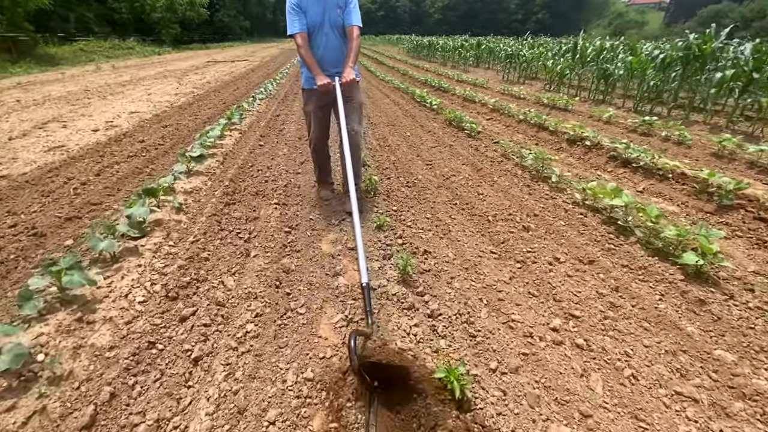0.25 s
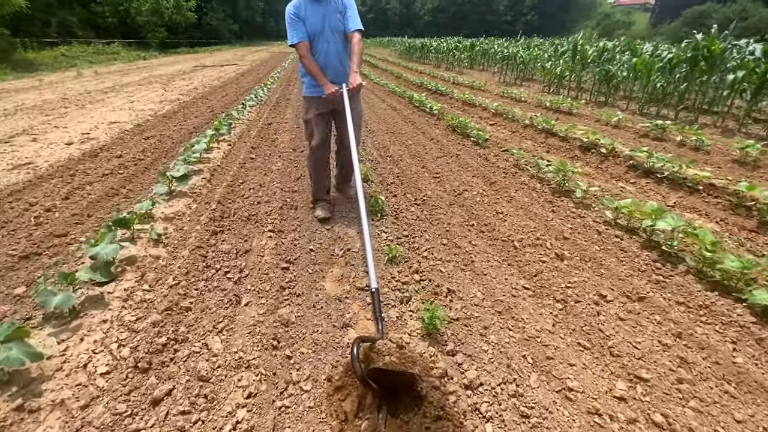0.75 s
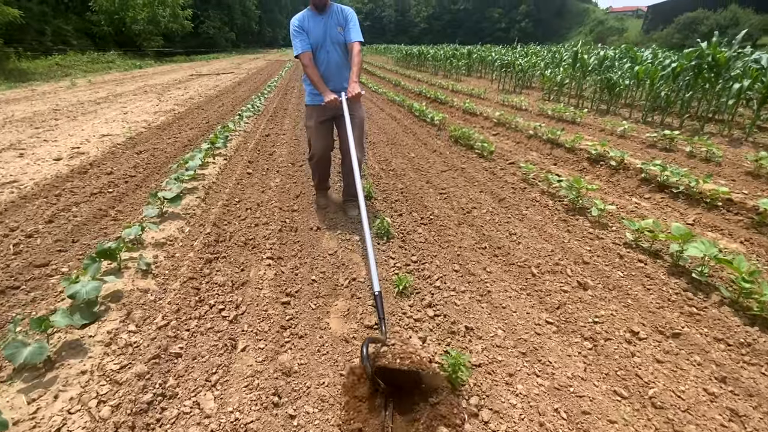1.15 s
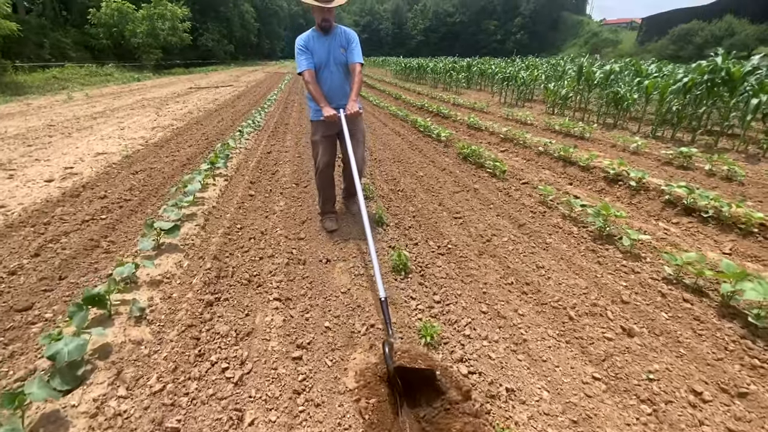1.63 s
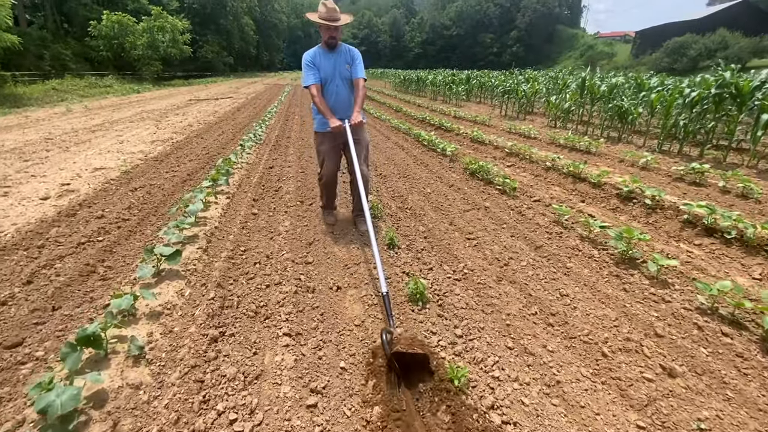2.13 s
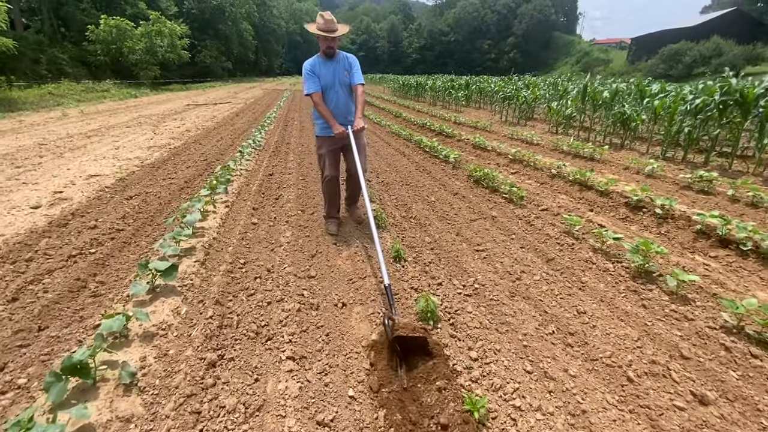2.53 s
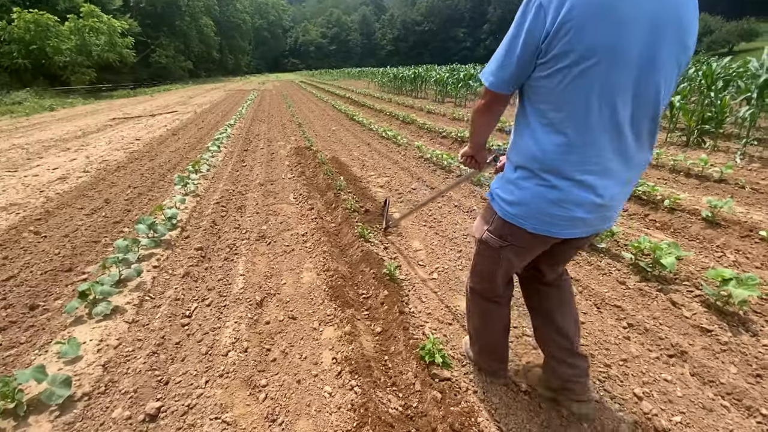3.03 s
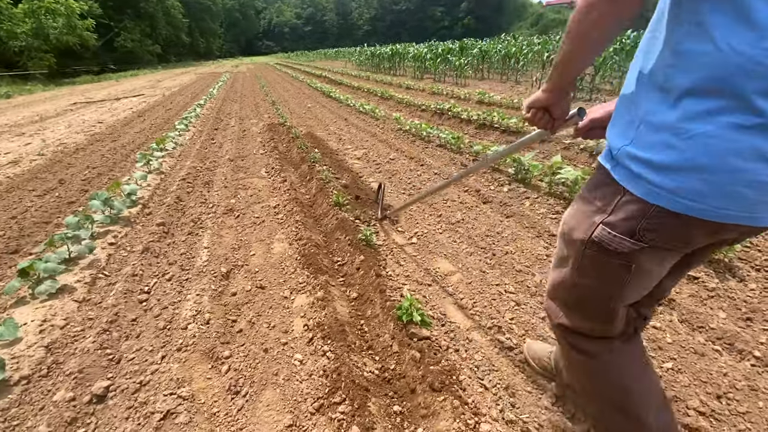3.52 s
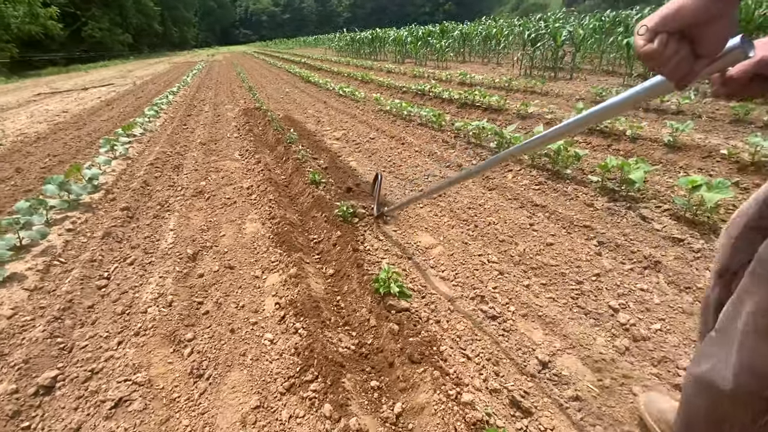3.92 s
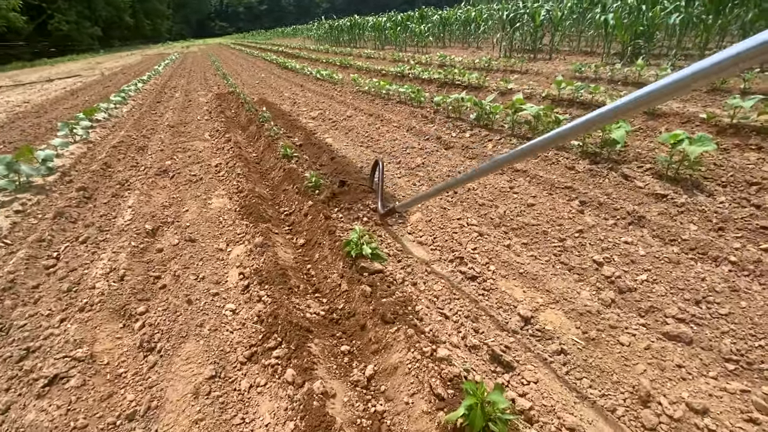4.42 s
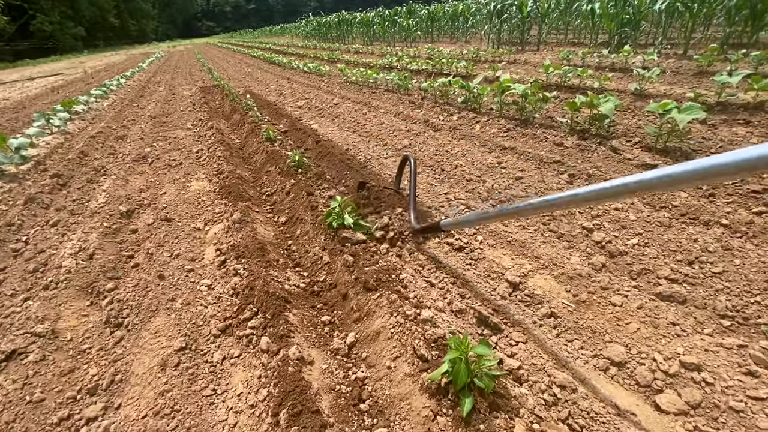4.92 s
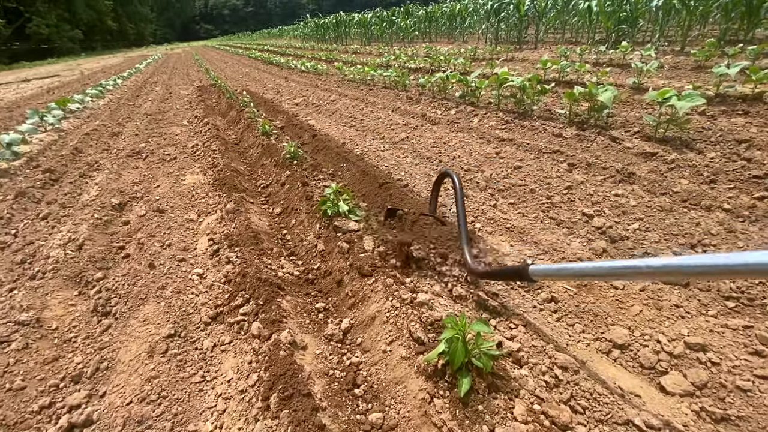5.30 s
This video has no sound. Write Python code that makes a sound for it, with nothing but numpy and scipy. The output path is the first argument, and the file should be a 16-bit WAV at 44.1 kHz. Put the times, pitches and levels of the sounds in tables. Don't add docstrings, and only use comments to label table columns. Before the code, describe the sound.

Outdoors in an open field, a steel hand plow is dragged through dry soil. At first it is quiet and distant: thin grit scraping, small stone ticks, soft thuds. After an abrupt cut it comes closer, with crunching crusts, hollow clod knocks and a few bird chirps, then builds to loud scraping and metallic clanks. Stereo camera microphones, with low wind rumble.

```python
import sys
import numpy as np
from scipy import signal
from scipy.fft import rfft, irfft, next_fast_len
from scipy.io import wavfile
from scipy.ndimage import uniform_filter1d, map_coordinates

SR = 44100
rng = np.random.default_rng(int(sys.argv[2]) if len(sys.argv) > 2 else 0)


def output_pcm(signal):
    pcm = np.clip(np.atleast_2d(signal).T, -1, 1) * 32767
    wavfile.write(sys.argv[1], SR, np.round(pcm).astype(np.int16))


def ratio_of_db(decibels):
    return 10 ** (np.asarray(decibels, float) / 20)


N = 244966
LONG = next_fast_len(N + SR // 4)
HZ = np.fft.rfftfreq(LONG, 1 / SR)
T = np.arange(N) / SR
NEW_STAND_S = 2.73


def unit(x):
    return x / np.sqrt(np.mean(x ** 2))


def shape(points):
    hz, db = np.transpose(points)
    return ratio_of_db(np.interp(np.log(HZ + 1), np.log(hz), db))


def colour(x, gain):
    return irfft(rfft(x, LONG) * gain, LONG)[..., :N]


def add(track, x, start_s):
    i = int(start_s * SR)
    track[i:i + len(x)] += x[:N - i]


def slew(rate):
    k = int(SR / rate)
    return uniform_filter1d(np.repeat(rng.standard_normal(N // k + 1), k), k)[:N]


def fade(t, t60):
    return np.exp(-np.log(1000) * t / t60)


def hump(start_s, length_s):
    rise_s, fall_s = 0.032, 0.028
    rise = (T - start_s) / rise_s + .5
    fall = (start_s + length_s - T) / fall_s + .5
    return np.clip(np.minimum(rise, fall), 0, 1)


def modes(table, hz, place_db):
    s = 1j * hz
    response = 0
    for k, (mode_hz, width, db) in enumerate(table):
        response = response + ratio_of_db(db + place_db[k]) * width * s / (s * s + width * s + mode_hz * mode_hz)
    return response


def ring(hz, t60, swell_s, turn):
    t = np.arange(2500) / SR
    return np.sin(2 * np.pi * (hz * t + turn)) * fade(t, t60) * (1 - np.exp(-t / swell_s))


def burst(t60, hz, width, chance):
    t, t60 = np.arange(len(chance)) / SR, np.clip(t60, .008, .5)
    body = signal.iirpeak(hz, hz / width, fs=SR)
    spiky = chance * np.abs(chance) ** 0.15
    x = signal.lfilter(*body, signal.lfilter(*body, spiky))
    x = x / np.sqrt(np.abs(uniform_filter1d(x ** 2, int(2 * SR / width) + 40)) + 1e-9)
    swell_s = 0.031 * t60 + 0.13 * t60 ** 2
    return x * (1 - np.exp(-t / swell_s)) * fade(t, t60)


def grains(rate, spread_db, flutter_db, flutter_rate):
    draw = rng.random((3, N))
    size = ratio_of_db(-spread_db * np.log(1.002 - draw[2]))
    cracks = (draw[0] < rate / SR) * np.sign(draw[1] - .5) * size
    return cracks * ratio_of_db(flutter_db * slew(flutter_rate))


def rubble(points, lo_hz, hi_hz, count, *kind):
    centres = np.geomspace(lo_hz, hi_hz, count)
    spacing = np.log(centres[1] / centres[0])
    near = np.exp(-(np.log((HZ + 1) / centres[:, None]) / spacing) ** 2)
    total = np.sum(near, axis=0)
    share = np.sqrt(near / (total + 1e-30) + (total < 1e-30) / count)
    return unit(sum(colour(grains(*kind), shape(points) * part) for part in share))


# start_s, scrape_db of the share, load_db of lumps it turns over
PULL = [(0, -59.5, -61.5), (.3, -56, -63.5), (.55, -60.5, -61.5), (1.6, -58, -56), (2.15, -63, -68.5),
        (2.72, -65.5, -57.5), (2.76, -55.5, -54.5), (3.5, -51, -48.5), (4.2, -47.5, -42), (4.75, -48, -45),
        (5.1, -44, -43.5), (5.42, -36.5, -41), (5.55, -49, -45)]
# start_s, length_s, load_db added
HEAVES = [(0.46, 0.048, 2.5), (1.204, 0.065, 10), (1.628, 0.1, 4), (2.061, 0.11, 11.5), (2.326, 0.17, 4),
          (2.818, 0.12, 2), (3.078, 0.1, 9), (3.205, 0.069, 5.5), (3.532, 0.21, 5.5), (3.83, 0.15, 2.5),
          (4.094, 0.17, 6), (4.638, 0.096, 6), (4.833, 0.1, 6.5), (5.061, 0.097, 8)]
# start_s, length_s, scrape_db added, load_db
LULLS = [(0.865, 0.087, 0.5, -7), (1.067, 0.1, 0.5, -12.5), (1.742, 0.056, 5.5, 1.5),
         (2.247, 0.089, 2.5, -7), (2.534, 0.17, -1.5, -4), (2.974, 0.073, -3.5, -3.5),
         (3.457, 0.054, -5, -7), (4.27, 0.036, 0.5, -1.5), (4.53, 0.06, -0.5, -4),
         (4.74, 0.059, -2.5, -5.5), (5.159, 0.034, -8, 2), (5.329, 0.016, -10, -5),
         (5.455, 0.037, -5.5, -5.5), (3.336, 0.064, -0.5, -0.5), (3.771, 0.027, -4.5, -2.5),
         (4.047, 0.076, -2, 1), (4.376, 0.034, 3.5, -2.5), (5.255, 0.031, -2.5, -4), (2.156, 0.059, 1, -1)]


def pull():
    start_s, *columns = np.transpose(PULL)
    scrape, load = (np.interp(T, start_s, c) for c in columns)
    heave = np.max([db * hump(s, length) for s, length, db in HEAVES], axis=0)
    scrape, load = scrape + 0.17 * heave, load + heave
    for s, length, scrape_db, load_db in LULLS:
        lull = hump(s, length)
        scrape, load = scrape + scrape_db * lull, load + load_db * lull
    return scrape, load


# pitch_hz, width_hz, level_db
BLADE_FRONT = [(1820, 1800, -9), (2690, 35, -3), (3700, 40, -7), (4480, 60, -6), (5050, 50, -6),
               (5310, 120, -6), (6060, 40, -3), (6420, 40, -4), (7550, 60, -6)]
# pitch_hz, width_hz, level_db
BLADE_SIDE = [(1000, 80, -4), (1213, 25, -5), (1504, 30, -6), (1680, 30, -4), (1920, 50, -2),
              (2130, 40, -2), (2195, 40, -3), (2450, 300, -7), (2700, 50, -6), (3040, 100, -4),
              (3560, 46, -7), (4190, 40, -3), (4770, 49, -8), (5460, 60, -4), (6000, 40, -8),
              (6500, 80, -8), (7270, 30, 0), (7372, 30, -4), (7450, 30, -3), (7510, 40, -4), (8570, 33, -4),
              (8730, 45, -3), (11100, 150, -10)]


def blade(force):
    front, even, sets = T < NEW_STAND_S, np.zeros(len(BLADE_SIDE)), 3
    out = colour(force * front, modes(BLADE_FRONT, HZ, even))
    for k in range(sets):
        sing = ratio_of_db(6.5 * slew(13) - 7.0)
        out = out + colour(force * ~front * sing, modes(BLADE_SIDE[k::sets], HZ, even))
    return out


# pitch_hz, level_db per hertz
GRIT = [(1180, -57), (2000, -3), (2470, -7), (3000, -0.5), (3350, -2.5), (4080, 0), (6840, -4.5),
        (7480, -2), (12000, -8), (15600, -10), (22000, -120)]
# pitch_hz, level_db per hertz
CRUMBS = [(200, -72), (500, -2), (900, 6), (1400, 7), (2500, -3), (3600, -14), (6000, -29), (12000, -56)]


def stream(grit_db, crumbs_db):
    grit = rubble(GRIT, 1060, 13800, 4, 6000, 3.53, 5.35, 25) * ratio_of_db(grit_db - 5.5)
    crumbs = rubble(CRUMBS, 1220, 4000, 3, 1300, 2.8, 6.5, 22) * ratio_of_db(crumbs_db - 3.5)
    return grit + crumbs + ratio_of_db(4.0) * blade(grit + 0.038 * crumbs)


# pitch_hz, level_db per hertz
CLODS = [(41, -8), (100, 3), (165, 2), (292, -1), (430, 0), (720, -3.5), (999, -9), (1420, -14),
         (1600, -12), (2080, -16), (3520, -120)]


def clods(clods_db):
    return rubble(CLODS, 108, 1020, 4, 250, 2.3, 2.7, 18) * ratio_of_db(clods_db - 3.5)


# start_s, level_db, pitch_hz, t60_s
RUBS = [(0, -71, 2670, 0.46), (1.424, -46.5, 1693, 0.072), (1.634, -54, 1510, 0.056),
        (1.567, -54, 4480, 0.17), (2.8, -66, 5900, 0.54), (3.859, -39, 5480, 0.11), (4.18, -53, 5500, 0.2),
        (4.175, -43, 2137, 0.1), (4.28, -42, 7480, 0.21), (4.3, -56, 5400, 0.48), (4.41, -49, 5470, 0.098),
        (4.52, -44, 7410, 0.18), (4.979, -43, 7230, 0.64), (5.062, -36.5, 7390, 0.21),
        (5.214, -37, 8740, 0.13), (5.21, -51, 965, 0.09), (5.264, -40, 1680, 0.1),
        (5.283, -38, 1905, 0.051), (5.302, -47, 3160, 0.03), (5.27, -43.5, 4830, 0.092),
        (5.313, -34, 4167, 0.2), (5.322, -34.5, 8650, 0.1), (5.335, -46.5, 5660, 0.21),
        (5.384, -36, 4130, 0.07), (5.41, -41.5, 2190, 0.1), (1.264, -47.5, 1530, 0.11),
        (1.567, -54, 2650, .04), (2.731, -52, 1703, 0.17), (3.686, -43.5, 7200, .06),
        (3.85, -51.5, 3640, 0.17), (3.86, -49, 7860, 0.14), (4.292, -45, 6490, .05),
        (4.33, -47, 3930, 0.063), (4.404, -45, 2240, 0.1), (4.469, -47, 5900, 0.033),
        (4.675, -46, 8750, 0.19), (4.675, -47, 7480, 0.18), (4.67, -50, 5480, 0.14),
        (4.921, -50, 6230, 0.074), (5.06, -36.5, 3080, 0.05), (5.063, -37, 8900, .12),
        (5.14, -46.5, 7400, 0.36), (5.345, -42, 4160, .08), (5.39, -47, 5600, 0.1),
        (5.428, -40, 8600, 0.073), (5.27, -49, 2160, 0.11)]


def rubs():
    out, chance = np.zeros(N), rng.standard_normal((len(RUBS), 16000))
    for (s, db, hz, t60), noise in zip(RUBS, chance):
        skips = uniform_filter1d(np.repeat(noise[::400], 400), 250)
        add(out, ratio_of_db(db + 6.0 + 3.9 * skips) * burst(t60, hz, 50 + 0.012 * hz, noise), s)
    return out


# start_s, level_db
GUSTS = [(0, -77), (.6, -70.5), (1.5, -60.5), (2.7, -60.5), (4.3, -46.5), (5.55, -51.5)]
# pitch_hz, level_db per hertz
WIND = [(12, -50), (28, -19), (45, 6.5), (70, 15.5), (110, 7.5), (200, -13), (600, -82)]
# pitch_hz, level_db per hertz
BUFFET = [(12, -46), (30, -10), (50, 2.5), (140, -7), (260, -13.5), (700, -80)]


def wind():
    wind_db = np.interp(T, *np.transpose(GUSTS)) - 3
    shared = unit(colour(grains(150, 2.5, 2.5, 7), shape(WIND)))
    own = np.array([unit(colour(grains(250, 2.5, 3., 7), shape(BUFFET))) for _ in range(2)])
    return ratio_of_db(wind_db + 7.0) * (shared + own * np.array([[1.5], [1.25]]))


def field_hiss():
    points = [(100, 6.5), (1000, -4.5), (6000, -20.0), (12000, -8), (13000, -0.5)]  # hz, level_db
    return ratio_of_db(-55.0) * unit(colour(rng.standard_normal((2, N)), shape(points)))


def strikes(table, broad, width):
    out, size = np.zeros(N), 8192
    chance = rng.standard_normal((len(table), 2, size))
    hz_axis = np.fft.rfftfreq(size, 1 / SR)
    for (s, db, hz, t60, ring_db), (fine, coarse) in zip(table, chance):
        crack = burst(t60, hz, width * hz, fine) + broad * burst(t60, 6300, 12800, coarse)
        plate = BLADE_FRONT if s < NEW_STAND_S else BLADE_SIDE
        steel = modes(plate, hz_axis, 3 * fine[::-1])
        add(out, ratio_of_db(db - 6) * (crack + ratio_of_db(ring_db + 12) * irfft(rfft(crack) * steel)), s)
    return out


# start_s, peak_db, pitch_hz, t60_s
STONES = [(0.2508, -35.5, 4130, 0.023), (0.277, -40, 7350, 0.027), (0.341, -45, 5030, 0.018),
          (.545, -54, 5500, .025), (.64, -46, 2740, 0.097), (0.389, -41.5, 5900, 0.054),
          (0.402, -38.5, 7300, 0.1), (0.763, -45, 4500, 0.035), (0.9694, -45, 4740, 0.022),
          (0.985, -32, 4240, 0.019), (1.097, -47, 6540, 0.024), (1.2232, -36, 3700, 0.12),
          (1.248, -31, 3800, 0.12), (1.253, -39.5, 5160, 0.18), (1.514, -43.5, 4030, 0.09),
          (1.737, -48, 6100, 0.04), (1.756, -37, 4870, 0.027), (1.922, -43, 4270, 0.024),
          (2.072, -38.5, 4200, 0.074), (2.312, -47, 4000, 0.032), (2.572, -46.5, 4400, 0.081),
          (2.6776, -50, 4560, 0.11),
          (3.113, -37.5, 3300, 0.22), (3.206, -44, 5600, 0.043), (3.248, -42, 8900, 0.021),
               (3.418, -35.5, 7200, 0.1), (3.686, -34.5, 6560, 0.049), (3.82, -33, 6660, 0.068),
               (3.8452, -30.5, 5960, 0.14), (4.2971, -36.5, 6700, 0.087), (4.471, -40, 5950, 0.053),
               (4.5256, -35, 7900, 0.035), (4.672, -33.5, 6800, 0.13), (4.822, -34, 5200, 0.038),
               (4.8496, -20, 4600, 0.05), (4.922, -32.5, 7200, 0.17), (4.993, -28, 7500, 0.26),
               (5.0677, -25, 7900, 0.083), (5.3198, -21.5, 3900, 0.034), (5.511, -42, 7220, 0.044)]


def stones():
    table = [(*row, -12 + 6 * np.log2(row[2] / 4500)) for row in STONES]
    return strikes(table, 1.0, 0.24)


# start_s, peak_db, pitch_hz
CLOD_KNOCKS = [(.374, -47.5, 450), (0.511, -48, 694), (0.643, -48, 367), (1.039, -48.5, 380),
               (1.219, -34.5, 643), (1.249, -34.5, 287), (1.572, -44.5, 520), (1.633, -35.5, 845),
               (2.08, -39, 770), (2.864, -32.5, 617), (3.144, -23, 535), (3.21, -40, 524),
               (3.246, -33, 553), (3.525, -28.5, 380), (3.592, -26.5, 350), (3.629, -31.5, 455),
               (3.914, -34, 363), (3.94, -32, 450), (4.008, -21, 357), (4.097, -27, 360),
               (4.113, -24.5, 530), (4.178, -35, 485), (4.219, -32.5, 540), (4.295, -34, 520),
               (4.494, -34, 454), (4.658, -16.5, 407), (4.932, -27, 408), (5.077, -19, 427),
               (5.529, -29.5, 443)]
# start_s, peak_db, pitch_hz
THUDS = [(1.102, -44.5, 154), (1.402, -40.5, 283), (1.54, -43, 190), (1.801, -38.5, 192), (1.895, -41, 213),
         (1.921, -43.5, 201), (2.129, -47, 130), (2.377, -37, 158), (2.597, -39, 125), (2.3, -49.5, 285),
         (2.87, -39, 283), (2.901, -37, 203), (2.939, -36.5, 223), (3.024, -42.5, 263), (3.064, -35.5, 214),
         (3.13, -23.5, 217), (3.6, -32, 170), (3.902, -49, 140), (3.96, -39, 150), (4.123, -22.5, 158),
         (4.199, -26, 210), (4.31, -35, 130), (4.6, -34, 149), (4.662, -29.5, 200), (4.747, -31, 151),
         (4.857, -33, 262), (5.079, -34, 190), (5.149, -26, 152.6), (5.2, -36.5, 271), (5.305, -29.5, 147),
         (5.372, -19, 185), (5.418, -21, 181), (5.45, -39, 302)]


def knocks():
    longest_s, knee_db, shorter_per_db = 0.13, -24.5, 0.25
    table = CLOD_KNOCKS + THUDS
    out, chance = np.zeros(N), rng.standard_normal((len(table), 8000))
    for (s, db, hz), noise in zip(table, chance):
        t60 = longest_s * np.exp(-shorter_per_db * max(db - knee_db, 0))
        add(out, ratio_of_db(db - 1) * burst(t60, hz, 0.51 * hz, noise), s)
    return out


# start_s, peak_db, pitch_hz
CRUSTS = [(0.392, -38.5, 2240), (.969, -39, 2460), (1.035, -48.5, 1290), (1.224, -33, 1160),
          (1.249, -33, 1420), (1.255, -33, 2620), (1.424, -36.5, 1970), (1.438, -40, 1520),
          (1.568, -36.5, 2280), (1.63, -37.5, 1680), (1.656, -48, 1000), (2.079, -37, 1250),
          (2.732, -46, 1670), (3.090, -42, 1700), (3.132, -28, 1220), (3.211, -39, 1300),
          (3.248, -34, 1280), (3.364, -36, 1220), (3.609, -29, 1100), (3.692, -39, 1520),
          (3.939, -30.5, 1160), (4.008, -35, 1200), (4.098, -30, 1200), (4.166, -40, 2110),
          (4.239, -27, 1140), (4.332, -26, 1160), (4.403, -33, 2020), (4.682, -23.5, 1240),
          (4.825, -27, 2030), (4.851, -23, 2960), (5.057, -28, 3070)]


def crusts():
    t60_s, ring_db = 0.046, -8
    return ratio_of_db(-0.5) * strikes([(*row, t60_s, ring_db) for row in CRUSTS], 0.37, 0.66)


# start_s, peak_db, pitch_hz
RAPS = [(.447, -44, 600), (2.851, -31.5, 635), (2.892, -29, 610), (2.937, -33, 690), (3.027, -34.5, 586),
        (3.066, -36, 497), (3.092, -41, 1030), (3.131, -22, 586), (3.14, -25, 422), (3.212, -33, 620),
        (3.248, -30, 550), (3.265, -30, 597), (3.819, -32, 740), (3.845, -43, 560), (3.937, -24, 700),
        (4.02, -33, 820), (4.1, -22.5, 470), (4.112, -27, 550), (4.121, -19, 505), (4.129, -20.5, 367),
        (4.14, -20, 606), (4.147, -22, 640), (4.166, -29, 750), (4.183, -25, 482), (4.221, -22, 540),
        (4.238, -21.5, 845), (4.33, -23.5, 860), (4.657, -17.5, 760), (4.659, -19, 418), (4.857, -15, 970),
        (4.87, -22.5, 620), (5.068, -32, 603), (5.09, -27, 700), (5.105, -31, 850), (5.121, -23.5, 450),
        (5.14, -36, 710), (5.29, -21, 910), (5.45, -20, 685)]


def raps():
    out, cycles = np.zeros(N), 8.3
    for (s, db, hz), turn in zip(RAPS, rng.random(len(RAPS))):
        add(out, ratio_of_db(db + 5.5) * ring(hz, cycles / hz, 0.0012, turn), s)
    return out


# middle_s, peak_db, pitch_hz
PUFFS = [(0.666, -38, 70), (.775, -41.5, 75), (.92, -49, 104), (1.23, -52, 115), (1.561, -41, 94),
         (1.586, -38, 58), (1.817, -34, 86), (1.875, -36.5, 92), (2.818, -39, 60), (3.27, -42, 80),
         (3.441, -43, 81), (3.585, -37, 80), (3.774, -32.5, 60), (3.931, -34, 95), (3.976, -34.5, 74.5),
         (4.061, -31, 75), (4.209, -27, 60), (4.331, -30, 89.5), (4.445, -35, 83), (4.529, -29.5, 69),
         (4.61, -38, 80), (4.755, -23.5, 95), (4.805, -39, 70), (4.985, -38, 64.4), (5.252, -29.5, 66.4)]


def puffs():
    out, cycles = np.zeros((2, N)), 3.47
    for (s, db, hz), (turn, lead, pan) in zip(PUFFS, rng.random((len(PUFFS), 3))):
        length_s = cycles / hz
        u = np.linspace(0, 1, int(length_s * SR))
        for track, side in zip(out, (.5, -.5)):
            swell = ratio_of_db(db + side * 7.4 * (pan - 1.0)) * np.sin(np.pi * u) ** 2
            phase = cycles * u + turn + side * 0.27 * (lead - .7)
            add(track, swell * np.sin(2 * np.pi * phase), s - length_s / 2)
    return out


# start_s, length_s, first_hz, middle_hz, last_hz, level_db
CHIRPS = [
    (2.789, 0.043, 2940, 3900, 4300, -57),
    (2.844, 0.018, 4450, 4200, 3900, -62),
    (2.965, 0.055, 5600, 4500, 4140, -53),
    (3.082, 0.04, 4850, 4450, 4250, -57),
    (3.245, 0.08, 4400, 4170, 3700, -59),
]


def bird():
    out = np.zeros(N)
    for s, length, *hz, db in CHIRPS:
        u = np.linspace(0, 1, int(length * SR))
        pitch = np.polyval(np.polyfit([0, .5, 1], hz, deg=2), u)
        swell = np.sqrt(u) * np.abs(np.sin(np.pi * u)) ** .5
        add(out, ratio_of_db(db + 4.0) * swell * np.sin(2 * np.pi * np.cumsum(pitch) / SR), s)
    return out * ratio_of_db(3.2 * slew(90))


# start_s, peak_db
CLANKS = [
    (4.401, -39),
    (5.059, -27),
    (5.2023, -23.5),
    (5.2152, -19),
    (5.2303, -25),
    (5.244, -27),
    (5.42, -29),
]
# pitch_hz, level_db, t60_s, lag aside in samples
NECK = [(1000, -4.5, 0.024, -16), (1680, -6.5, 0.026, -13), (1933, -3, 0.035, -0.5),
        (2190, -6.5, 0.023, -0.5), (2950, -6, 0.022, -3)]


def clanks():
    out = np.zeros((len(NECK), N))
    chance = rng.standard_normal((len(CLANKS), len(NECK), 2500))
    for (s, db), draws in zip(CLANKS, chance):
        for track, (hz, mode_db, t60, _), noise in zip(out, NECK, draws):
            a, b = noise[:2]
            tone = ring(hz * (1 + 0.011 * b), t60, 0.0027, b)
            rough = tone + 0.34 * burst(1.2 * t60, hz, 0.23 * hz, noise)
            add(track, ratio_of_db(db + mode_db + 1.8 * a + 4.0) * rough, s)
    return sum(ports(np.array([track, track]), row[3]) for track, row in zip(out, NECK))


# start_s, peak_db, pitch_hz
SHATTER = [(5.266, -30, 1680), (5.297, -39, 2100), (5.346, -37, 3720), (5.373, -44, 2600),
           (5.284, -27, 1630), (5.407, -30, 3080), (5.418, -40, 2220), (5.45, -39, 1480),
           (5.512, -29.5, 1100)]


def shatter():
    t60_s, ring_db = 0.061, -4
    return ratio_of_db(-0.5) * strikes([(*row, t60_s, ring_db) for row in SHATTER], 0.37, 0.66)


def ground(x):
    t = np.arange(4000) / SR
    tails = rng.standard_normal((2, len(t))) * fade(t, .05)
    tails = rfft(tails / np.sqrt(np.sum(tails ** 2, axis=1, keepdims=True)), LONG)
    return ratio_of_db(2.0) * colour(x, 1 + ratio_of_db(-5) * tails * shape([(500, -8), (2500, 0)]))


# start_s, lag in samples
LEFT_LAG = [(0, -0.5), (2.72, 1), (2.74, 6.5), (3.8, 10.5), (4.5, 15.5), (5.55, 18.5)]
# pitch_hz, level_db
LEFT_FRONT = [(250, 1), (500, 2), (1500, -2), (2900, 1), (4000, 8), (6300, 16), (7500, 8), (9000, 1)]
# pitch_hz, level_db
LEFT_SIDE = [(60, 1), (220, 3), (370, -3), (1000, -1), (2500, 1), (5300, 3), (7500, 1), (8700, -3)]


def ports(x, aside):
    lag = np.interp(T, *np.transpose(LEFT_LAG)) + aside
    left = map_coordinates(x[0], [np.arange(N) - lag], order=3, mode="nearest")
    front = T < NEW_STAND_S
    pair, side = np.array([left, x[1]]), np.array([[.5], [-.5]])
    return colour(pair * front, shape(LEFT_FRONT) ** side) + colour(pair * ~front, shape(LEFT_SIDE) ** side)


def scene():
    scrape, load = pull()
    grit_db, clods_db = scrape, load + 2
    crumbs_db = scrape + 0.52 * (load - scrape) - 1
    plow = stream(grit_db, crumbs_db) + rubs() + stones() + crusts() + shatter()
    lumps = clods(clods_db) + knocks() + raps()
    air = ports(ground(plow + lumps), 0) + clanks()
    furrow = 1.18 * stream(grit_db, crumbs_db) + 0.88 * clods(clods_db)
    air = air + ports(ground(furrow), -3.5)
    return air + bird() + wind() + puffs() + field_hiss()


def low_pass(x):
    return signal.sosfilt(signal.butter(12, 16320, fs=SR, output="sos"), x)


# pitch_hz, level_db
TREBLE = [(9300, 0), (9500, -7), (9750, 0), (12250, -3), (12550, -23), (13600, -24), (14100, -10),
          (14700, -15), (15600, -21), (15850, -50)]
# pitch_hz, lead in radians
RIGHT_LEAD = [(60, 2.0), (100, 2.1), (140, 1.5), (190, 1.1), (260, 0.9), (450, 0.6), (1200, 0.17)]


def record(dry):
    hz, lead = np.transpose(RIGHT_LEAD)
    left, right = rfft(dry, LONG) * shape(TREBLE)
    right = right * np.exp(1j * np.interp(HZ, hz, lead))
    top = 0.25 * np.clip((HZ - 9600) / 800, 0, 1)
    late = np.exp(-2j * np.pi * HZ * 12 / SR)
    left = np.cos(top) * left + np.sin(top) * right * late
    return low_pass(irfft(np.array([left, right]), LONG)[:, :N])


dry = scene()
out = record(dry)
output_pcm(out)
```